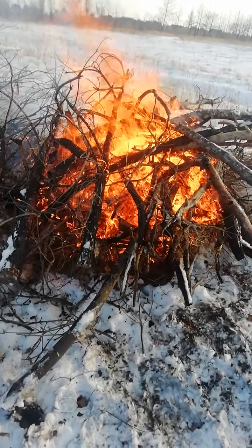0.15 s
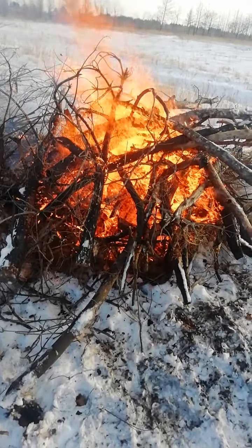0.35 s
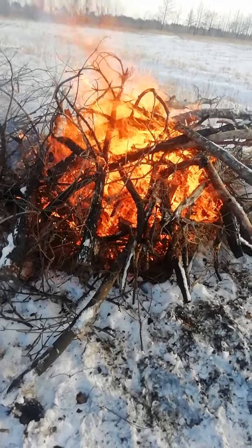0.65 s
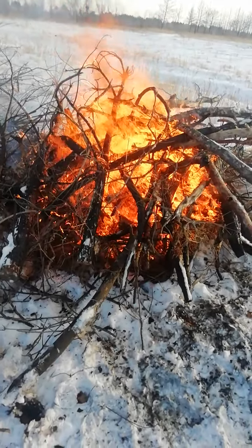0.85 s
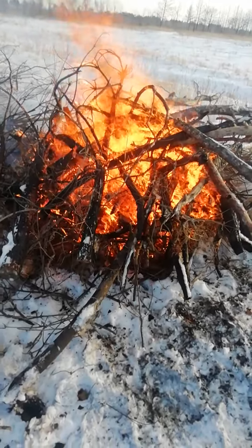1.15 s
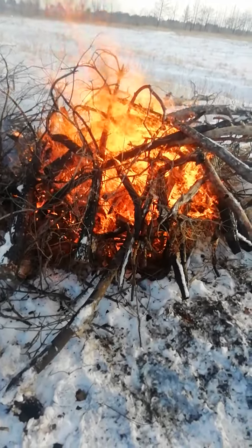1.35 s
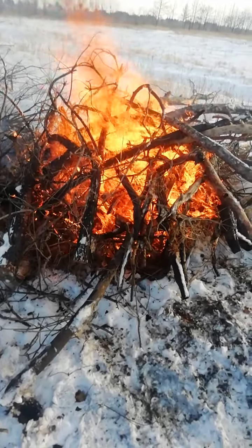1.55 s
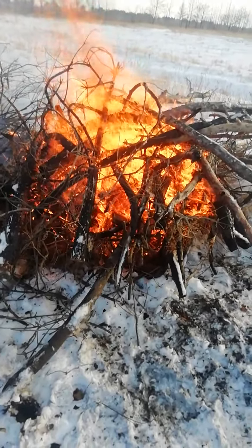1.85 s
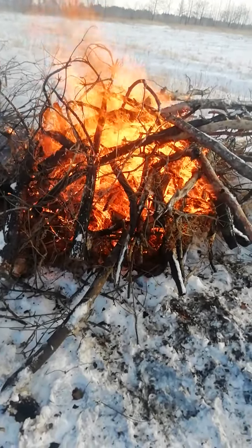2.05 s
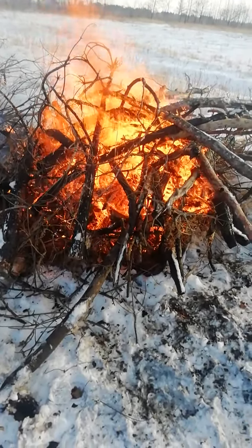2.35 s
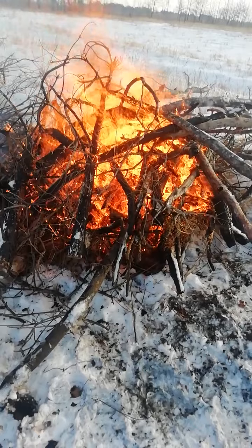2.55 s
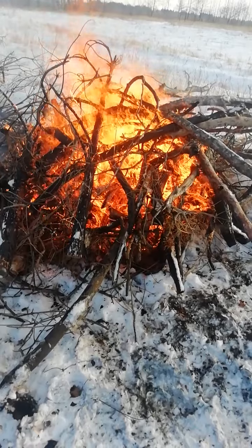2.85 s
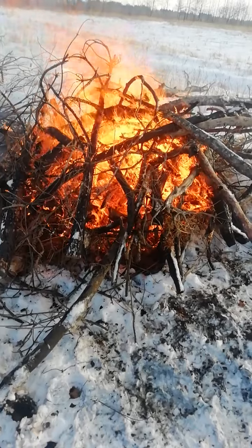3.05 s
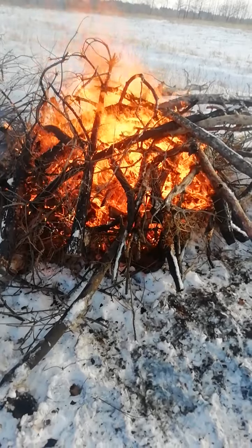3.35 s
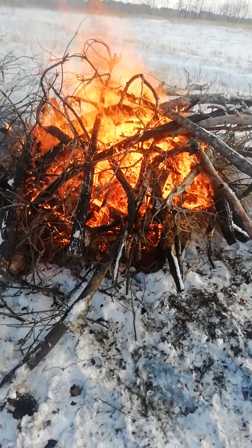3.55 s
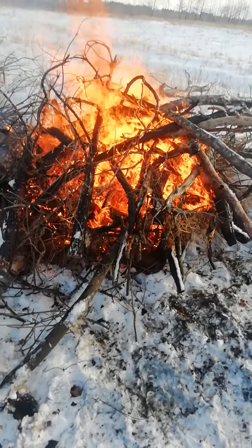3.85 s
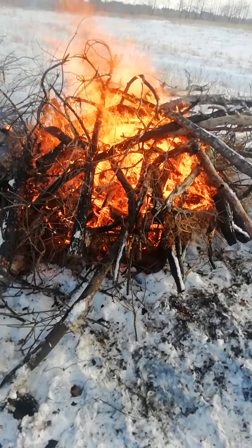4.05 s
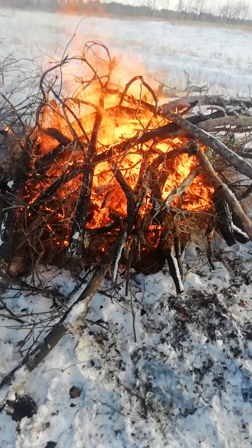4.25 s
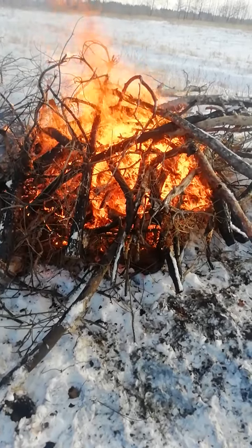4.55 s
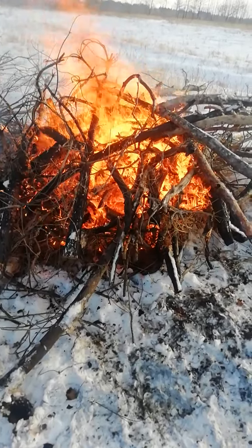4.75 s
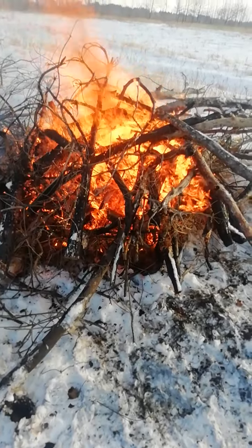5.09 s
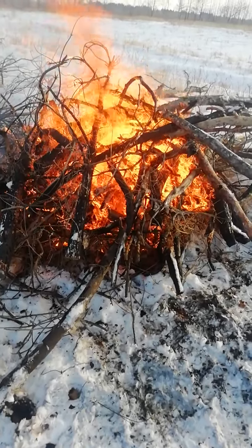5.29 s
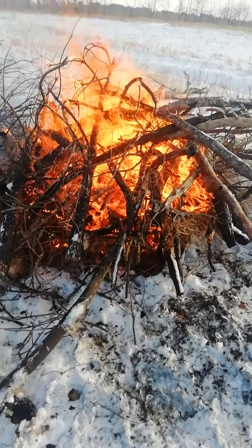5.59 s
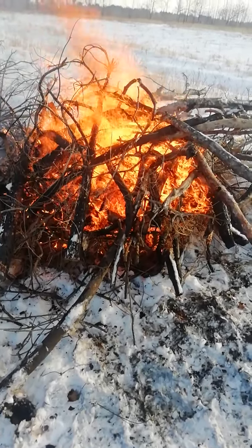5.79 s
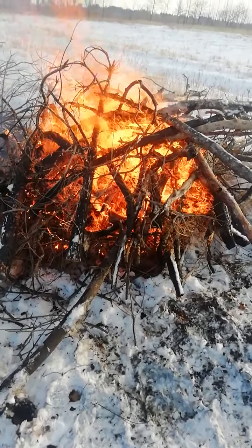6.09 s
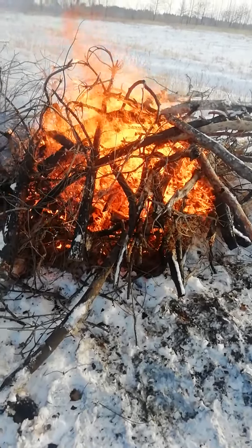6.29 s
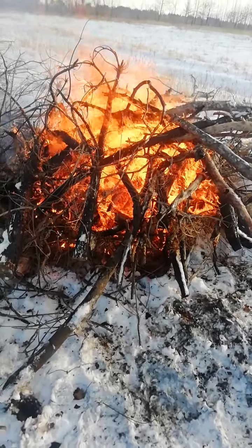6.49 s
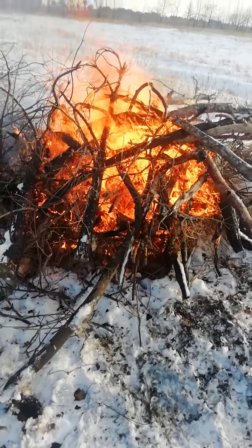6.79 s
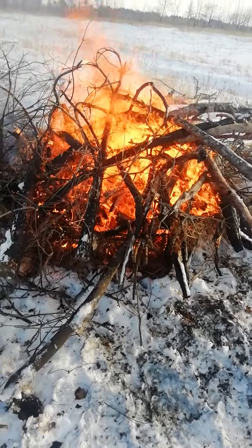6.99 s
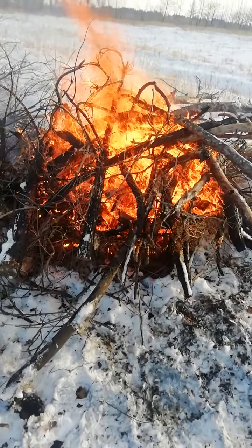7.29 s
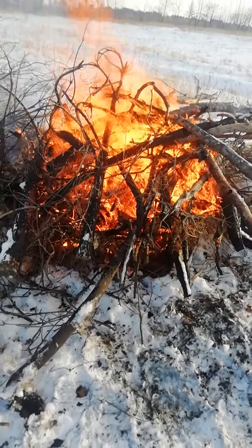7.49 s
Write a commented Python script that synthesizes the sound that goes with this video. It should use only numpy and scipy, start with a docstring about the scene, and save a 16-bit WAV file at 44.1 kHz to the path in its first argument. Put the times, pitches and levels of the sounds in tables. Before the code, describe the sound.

A bonfire of dry branches burns a few steps from a handheld phone outdoors. Dense tiny ticks and crisp pops continue throughout, with an early flurry of snaps, scattered lighter cracks and several hard, piercing ones later. Soft low rumble and a thin hiss stay behind them. Muffled gusts thump the microphone early and around two seconds, then grow sparse. The sound is dry and close, leaning slightly left.

```python
"""Brushwood bonfire in the open

A big brushwood bonfire burns in a snowy field, a few steps from a hand-held phone with two microphone ports.
Splitting branches are filtered noise bursts led by a sharp crack, with a short scatter from the pile;
thick limbs add a damped knock. Many small splits make the twigs crackle, and flickering noise is sizzling sap.
Coloured noise underneath gives the rumble and rush of flames and the buffeting of gusts.
The open snow returns no echo."""
import sys
import numpy as np
from scipy import signal
from scipy.fft import rfft, irfft, next_fast_len
from scipy.io import wavfile
from scipy.ndimage import uniform_filter1d

SR = 44100
rng = np.random.default_rng(int(sys.argv[2]) if len(sys.argv) > 2 else 0)


def to_wav(s):
    """Save 16-bit WAV."""
    ch = np.atleast_2d(s).T  # columns
    pcm = np.round(np.clip(ch, -1, 1) * 32767)  # PCM
    wavfile.write(sys.argv[1], SR, pcm.astype(np.int16))


N = 336483  # samples

# puffs of wind at the phone, at full strength from start to start + hold:
# start_s, hold_s, level_db
WIND_PUFFS = [(.01, 0.035, -31.5), (0.112, 0.098, -35.5), (0.454, 0.082, -43), (0.764, 0.044, -41.5),
              (1.234, 0.055, -39), (1.501, 0.073, -27.5), (1.726, 0.044, -30), (1.81, 0.046, -35.5),
              (1.927, 0.074, -35.5), (2.071, 0.037, -34.5), (2.251, 0.028, -32), (2.325, .11, -31),
              (2.48, 0.035, -32.5), (2.934, 0.045, -30.5), (3.014, 0.044, -37.5), (3.2, 0.03, -33),
              (3.293, 0.27, -42), (3.716, 0.023, -34), (3.86, .17, -40.5), (4.077, 0.043, -35),
              (4.92, 0.14, -46), (7.283, 0.048, -34), (7.544, 0.018, -41)]
# relative spectrum of the wind pressure on the ports: frequency_hz, density_db_per_hz
BUFFET_SPECTRUM = [(9, -42), (18, -9), (38, 1), (75, 0), (115, -4.5), (220, -19), (370, -37), (900, -61.5)]
# relative spectrum of the deep rumble of the plume: frequency_hz, density_db_per_hz
RUMBLE_SPECTRUM = [(12, -14), (22, -3), (53, 4), (100, -0.5), (145, -2.5), (210, -5.5), (260, -11),
                   (320, -22.5), (500, -45), (1200, -56)]
# relative spectrum of the rush of burning gas: frequency_hz, left_db_per_hz, right_db_per_hz
RUSH_SPECTRUM = [(101, -27, -22), (289, -0.5, 7.5), (470, 1.5, 0), (670, -1.5, -9.5), (1160, -2, 1),
                 (2040, -19, -6), (2290, -14.5, -13.5), (2650, -15, -12.5), (5160, -26, -18),
                 (16000, -24, -23)]
# how briskly the twigs burn, given as the sizzle level: time_s, level_db
BURN_LEVEL = [(0.0, -53), (0.1, -56), (1.17, -54), (1.32, -57), (2.68, -54), (3.06, -58), (3.74, -55),
              (4.25, -59), (4.57, -54), (5.33, -58), (5.52, -55), (5.91, -59), (6.14, -59), (6.27, -54),
              (6.42, -53), (6.76, -58), (7.18, -56), (7.63, -58)]
# knocks of the thicker sticks and limbs: start_s, pitch_hz, peak_db
LIMB_KNOCKS = [(0.1221, 5300, -16), (.2903, 2080, -24), (1.1032, 3040, -21), (1.1847, 2220, -40),
               (1.5874, 1350, -28.5), (2.7199, 1830, -26), (3.7365, 1580, -31.5), (3.944, 1800, -28),
               (5.8941, 1600, -29), (6.277, 1260, -35), (6.4621, 2080, -25.5), (6.5767, 1550, -32),
               (6.607, 1700, -25.5)]
# splitting branches: start_s, energy_db (over 1 ms), lowest_note_hz, treble_slope_db_per_octave,
# left_minus_right_db, length_ms (the fibre decay time is proportional to it)
BRANCH_SPLITS = [(0.0426, -14.5, 6950, -9.5, -3.5, 0.98), (0.1107, -18, 4000, -3, -1, 2.1),
                 (0.1228, -11, 5940, -3, -8, 0.71), (0.1337, -15, 4300, 0.5, -3, 1.2),
                 (0.2904, -23.5, 6900, -6.5, -3, 1.5), (.3168, -25.5, 5140, -13, -5, 0.9),
                 (.4261, -27, 4700, -5, -2, 2.4), (.4926, -28.5, 4700, -11, -1, 1.8),
                 (0.5314, -13, 6900, -5, -3, .5), (0.6416, -26, 6900, -6, -5, 1),
                 (0.9561, -23, 5100, 0, -10, 0.89), (0.9815, -17.5, 7500, -6, -10, 1.2),
                 (1.024, -25, 900, 0.5, -6, 1), (1.048, -16.5, 7500, -5, -3.5, 4.7),
                 (1.1031, -5, 4730, -4, -5, 0.72), (1.1856, -16.5, 2740, 2, -3.5, 0.94),
                 (1.2236, -22.5, 6400, -4, -5, 1.4), (1.2776, -30.5, 6900, -10, -9, 1.6),
                 (1.331, -29, 2100, 0, -9, 0.67), (1.4963, -17, 4280, 0, -3, 0.52),
                 (1.5885, -16.5, 4900, -12.5, 1.5, 0.85), (1.8096, -28, 7500, -11.5, -7, 1.1),
                 (1.8571, -26.5, 7500, -1, -1, 1.4), (1.8804, -24, 6400, 1, -7, 1.9),
                 (2.0762, -19, 7500, -4, -1, 0.74), (2.093, -22, 7500, -1, -1, 1.5),
                 (2.2343, -16, 4700, -8, -1, 0.59), (2.2792, -21.5, 3200, -.5, -2.5, 1.2),
                 (2.3144, -30, 5500, -11, -2, 1.2), (2.4001, -20.5, 3770, -7, 4, 0.68),
                 (2.4244, -13, 1200, 4.5, -7, 1.8), (2.431, -21, 1990, 0.5, 10, 1.9),
                 (2.657, -25.5, 900, .5, -7, 1.2), (2.7211, -20, 4300, -11.5, -5, 1.2),
                 (2.7459, -24, 1600, 0.5, -4, 2.4), (2.7576, -24, 3400, -1, -4, 9.3),
                 (3.3085, -29.5, 1600, 3, -1, 7), (3.3389, -30, 1800, -1.5, -2, 0.64),
                 (3.4802, -21.5, 2800, -0.5, -8, 1.5), (3.5349, -28.5, 7500, -6, -2, 1.3),
                 (3.7373, -3.5, 5960, -4.5, -3, 1.8), (3.9215, -18, 6900, -7, -8, 0.65),
                 (3.944, -11, 5940, -10.5, -7, 1.8), (4.0056, -24.5, 5100, -4, -7, 0.43),
                 (4.22, -18.5, 7000, -5, -8, 0.6), (4.4346, -29, 3400, 0, -4, 3.4),
                 (4.481, -32.5, 3700, -11.5, 0, 1.4), (4.5699, -24.5, 6900, -9.5, 2, 0.98),
                 (4.7995, -19.5, 5500, -5.5, 3, 0.92), (4.8829, -31.5, 1200, -4.5, -4, 2.3),
                 (5.2537, -18, 7500, -4, -4, 1.2), (5.4084, -25.5, 7500, -6, 0, 1),
                 (5.5862, -22.5, 900, 11, -2, 2.1), (5.6455, -24.5, 2100, -4, -1, 6.3),
                 (5.7894, -20.5, 7500, -4, -7, 1.5), (5.8099, -23, 5100, -2.5, -3, 3.1),
                 (5.8806, -24, 2300, 3, 4, 2.6), (5.8933, -4.5, 5700, -5, -5, 1.33),
                 (6.0757, -18, 3770, 1.5, 0, 0.41), (6.1569, -28, 4300, -11.5, 2, 1.1),
                 (6.2052, -15.5, 7500, -5.5, -5, 0.58), (6.279, -16, 6400, -8.5, -4, 0.44),
                 (6.4238, -24, 7500, -7, -6, 1.6), (6.4619, -7.5, 7550, -4, -7.5, 0.72),
                 (6.5772, -19.5, 3400, 6, 0, 1.7), (6.5995, -25, 3400, 2, 6, 3.3),
                 (6.6066, -11.5, 2100, 1, -3, 2.3), (7.1484, -21.5, 7000, -8.5, -2.5, 1.3),
                 (7.3386, -31, 7600, -13.5, -12, 0.92)]
# colour of the two microphone ports: frequency_hz, left_db, right_db
PORT_COLOUR = [(724, -10.5, -27.5), (1260, -17.5, -8.5), (2100, -15, -5), (2075, -18, -4),
               (2850, -18.5, -18.5), (3440, -9.5, -14.5), (4930, -9, -14), (6130, -6.5, -6.5),
               (6530, -7, 2), (7890, 1, 2.5), (9550, -7, -9), (10330, -13.5, -11.5), (13000, -20, -17),
               (16200, -24.5, -17)]

PORT_LAG_MS = 0.1904  # arrival at the right port after the left
TOP_HZ = 15900  # upper limit of the phone
GUST_ATTACK_S, GUST_RELEASE_S = 0.021, 0.027
BREEZE_DB, BREEZE_SWAY_DB = -54.5, 2  # moving air between the puffs: mean level and rms sway
FLAME_DB = -44.5  # mean level of the rumble
FLAME_SWELL_DB, FLAME_SWELL_RATE = 0.26, 2.06  # rms swell; new swell levels a second
HALF_LEFT_RIGHT = np.array([[0.5], [-0.5]])  # shares a level difference between the ports


def undb(db):
    """Amplitude ratio: 20 dB is a factor of ten."""
    return 10 ** (np.asarray(db) / 20)


def level(x, db):
    """Root-mean-square level: scale a signal to it."""
    return x * undb(db) / np.sqrt(np.mean(x ** 2))


def curve(table, axis):
    """Linear interpolation: one column of a time table at every sample."""
    rows = np.array(table, float)
    return np.interp(np.arange(N) / SR, rows[:, 0], rows[:, axis])


def shape(table, hz, axis=1):
    """Spectral envelope: one dB column of a table, joined on a log-frequency axis."""
    rows = np.array(table, float)
    return np.interp(np.log(hz + 1), np.log(rows[:, 0]), rows[:, axis])


def ports(hz):
    """Microphone response: the left and right port colour in dB."""
    return np.array([shape(PORT_COLOUR, hz, axis=1), shape(PORT_COLOUR, hz, axis=2)])


def causal(db):
    """Minimum phase: the response to a dB spectrum rings after a blow, never before."""
    cepstrum = irfft(np.log(undb(db)))
    half = cepstrum.shape[-1] // 2
    cepstrum[..., 1:half] *= 2
    cepstrum[..., half + 1:] = 0
    return np.exp(rfft(cepstrum))


def delay(hz, lag_ms):
    """Propagation delay: a phase lag proportional to frequency."""
    return np.exp(-2j * np.pi * hz * lag_ms / 1000)


def noise(colour, likeness, lag_ms=PORT_LAG_MS):
    """Partial coherence: coloured stereo noise whose shared part reaches the right port later."""
    size = next_fast_len(N, real=True)
    hz = np.fft.rfftfreq(size, 1 / SR)
    shared, left, right = rfft(rng.standard_normal((3, size)))
    c = np.clip(likeness, 0, 1)
    common = np.array([shared, shared * delay(hz, lag_ms)])
    pair = np.sqrt(c) * common + np.sqrt(1 - c) * np.array([left, right])
    return level(irfft(pair * undb(colour(hz)), size)[:, :N], 0)


def walk(rate):
    """Slow random modulation: levels held 1 / rate s, smoothed twice and scaled to unit rms."""
    hold = max(int(SR / rate), 2)
    steps = np.repeat(rng.standard_normal(N // hold + 1), hold)
    smooth = uniform_filter1d(uniform_filter1d(steps, hold), hold)
    return level(smooth[:N], 0)


def place(starts, sounds):
    """Superposition: short stereo sounds add on the time line."""
    size = sounds.shape[-1]
    out = np.zeros((2, N + size))
    first_samples = np.clip(starts * SR, 0, N - 1).astype(int)
    for i, sound in zip(first_samples, sounds):
        out[:, i:i + size] += sound
    return out[:, :N]


def airflow():
    """Gust envelope: each puff rises quickly, holds and decays exponentially into a light breeze."""
    t = np.arange(N) / SR
    strength = undb(BREEZE_DB + BREEZE_SWAY_DB * walk(3.82))
    for start, hold, db in WIND_PUFFS:
        rise = np.clip(1 + (t - start) / GUST_ATTACK_S, 0, 1)
        fall = np.exp(-np.maximum(t - start - hold, 0) / GUST_RELEASE_S)
        strength = np.maximum(strength, undb(db) * rise * fall)
    return strength


def wind(eddy_db=-12, eddy_growth=0.3, gust_db=-32):
    """Turbulent pressure: large eddies press both ports alike; small ones differ and grow in hard puffs."""
    strength = airflow()
    large = noise(lambda hz: shape(BUFFET_SPECTRUM, hz), 0.96)
    # small eddies carry little below 170 Hz
    small = noise(lambda hz: shape(BUFFET_SPECTRUM, hz) - 10 * np.log10(1 + (170 / (hz + 1)) ** 4), 0.4)
    small_share = undb(eddy_db) * (strength / undb(gust_db)) ** eddy_growth
    return (large + small_share * small) * strength


def flames():
    """Combustion noise: the plume rumbles and flaps, the burning gas rushes and shares a little of its swell."""
    swell_db = FLAME_SWELL_DB * walk(FLAME_SWELL_RATE)
    flap_db = 1.43 * walk(25)
    rumble = noise(lambda hz: shape(RUMBLE_SPECTRUM, hz), 1.0) * undb(FLAME_DB + swell_db + flap_db)

    def rush_colour(hz):
        """Two-port spectrum of the burning gas."""
        return np.array([shape(RUSH_SPECTRUM, hz, axis=1), shape(RUSH_SPECTRUM, hz, axis=2)])

    rush = noise(rush_colour, 0.37, lag_ms=0.15)
    return rumble + rush * undb(-53.5 + 0.1 * walk(17) + 0.18 * swell_db)


def sap(burn_db, flicker_db=1.5, pan_db=1.5):
    """Jet noise: steam sizzles out of the hot wood, flickering quickly."""
    steam = noise(lambda hz: ports(hz) - 1.8 * np.log2(1 + hz / 1000), 0.038)
    return steam * undb(burn_db + flicker_db * walk(170) + pan_db * HALF_LEFT_RIGHT)


def splits(events, crack, scatter_db, scatter_ms, grain_db, ring_db,
           hand_ms=0.905, hand_gain=0.91, tear=1.67, size=1536):
    """Brittle fracture: a first crack, a run of tearing fibres, then a short scatter among the branches."""
    start, db, low_hz, slope, pan, length = np.array(events, float).T[:, :, None, None]
    ms = 1000 * np.arange(size) / SR
    hz = np.fft.rfftfreq(size, 1 / SR)
    chance = rng.standard_normal((len(events), 5, size))
    length = np.maximum(length, 0.3)

    # the tearing outlasts the split
    fibres = chance[:, :1] * undb(grain_db * chance[:, 1:2]) * np.exp(-ms / (tear * length))
    fibres /= np.linalg.norm(fibres, axis=-1, keepdims=True)
    # a quick split spends most of itself in the first crack
    fibres[..., :1] += crack / length

    # the right port hears it later, and once more off the hand; both lags vary with the place in the pile
    lag_factor = 1 + 0.178 * chance[:, 4, 1:2]
    direct = delay(hz, PORT_LAG_MS * lag_factor)
    bounce = delay(hz, hand_ms * lag_factor) * np.minimum(hz / 6000, 1)
    paths = np.stack([np.ones_like(direct), direct + hand_gain * bounce], axis=1)

    scatter_decay = np.exp(-ms / scatter_ms) + 0.12 * np.exp(-ms / 10)
    scatter = chance[:, 2:4] * (1 - np.exp(-ms)) * scatter_decay
    scatter *= undb(scatter_db) / np.linalg.norm(scatter, axis=-1, keepdims=True)

    # a small split radiates weakly below its lowest note
    bass_loss = 10 * np.log10(1 + (low_hz / (hz + 100)) ** 5)
    wood = slope * np.log2((hz + 100) / low_hz) - bass_loss
    # every stick has a resonance of its own
    ring_hz = 6200 * 2 ** (0.47 * chance[:, 4:, :1])
    wood = wood + ring_db / (1 + ((hz - ring_hz) / 450) ** 2)

    response = causal(np.maximum(wood, -60) + ports(hz))
    sounds = irfft((rfft(fibres) * paths + rfft(scatter)) * response)
    sounds *= undb(pan * HALF_LEFT_RIGHT) / np.linalg.norm(sounds, axis=-1, keepdims=True)
    # port-averaged energy, relative to full scale lasting 1 ms
    energy = np.sum(sounds ** 2, axis=(1, 2), keepdims=True) * ms[1] / 2
    return place(start.ravel(), sounds * undb(db) / np.sqrt(energy))


def twigs(burn_db, top_db=-30, range_db=18, vigour=0.62, crowding=0.83, bunching_db=1.28, count=660):
    """Random fractures: many faint crackles and few clear ones, denser and louder where burning is brisk."""
    when, faint, note, tilt, side, length = rng.random((count, 6)).T
    # uniform draws on the cumulative rate crowd the crackles where the rate is high
    brisk = np.cumsum(undb(crowding * burn_db + bunching_db * walk(25)))
    at = np.searchsorted(brisk, when * brisk[-1])
    db = top_db - range_db * np.sqrt(faint) + vigour * (burn_db[at] - np.mean(burn_db))
    low_hz = 7000 - 5800 * note ** 2
    slope = 4.5 - 11 * tilt  # dB per octave
    pan_db = 10 * side - 7
    length_ms = 0.5 + 1.7 * length
    events = np.transpose([at / SR, db, low_hz, slope, pan_db, length_ms])
    return splits(events, crack=1.22, scatter_db=-2.5, scatter_ms=2.9, grain_db=7.0, ring_db=7.5, size=1024)


def limbs(decay_ms=1.0, rattle_db=-26, rattle_ms=3.7, size=1024):
    """Damped resonance: a split in a thick limb also knocks in one mode, rattled on by the pile."""
    start, hz, db = np.array(LIMB_KNOCKS, float).T[:, :, None, None]
    ms = 1000 * np.arange(size) / SR
    late = np.maximum(ms - np.array([[0], [PORT_LAG_MS]]), 0)
    mode = np.sin(2 * np.pi * hz * late / 1000) * np.exp(-late / decay_ms)
    # the push is one impulse followed by a weak decaying rattle
    push = undb(rattle_db) * rng.standard_normal((len(LIMB_KNOCKS), 2, size)) * np.exp(-ms / rattle_ms)
    push[..., 0] += 1
    knocks = signal.fftconvolve(mode, push, axes=-1)[..., :size]
    # a narrow limb radiates little bass
    highpass = signal.butter(3, 1000, "high", fs=SR, output="sos")
    sounds = signal.sosfilt(highpass, knocks)
    return place(start.ravel(), sounds * undb(db) / np.abs(sounds).max(axis=-1, keepdims=True))


def branches():
    """Brittle fracture of the larger branches: the loud snaps."""
    return splits(BRANCH_SPLITS, crack=1.57, scatter_db=1.0, scatter_ms=2.4, grain_db=1.5, ring_db=0.5)


def scene():
    """Superposition of the whole fire, from the wind up to the branches."""
    burn_db = curve(BURN_LEVEL, axis=1)
    background = wind() + flames()
    return background + sap(burn_db) + twigs(burn_db) + limbs() + branches()


def record(dry):
    """Overload and band limit: peaks are clipped at full scale, then the phone cuts the top."""
    lowpass = signal.ellip(10, 0.2, 70, TOP_HZ, fs=SR, output="sos")
    return signal.sosfilt(lowpass, np.clip(dry, -1, 1))


dry = scene()
out = record(dry)
to_wav(out)
```